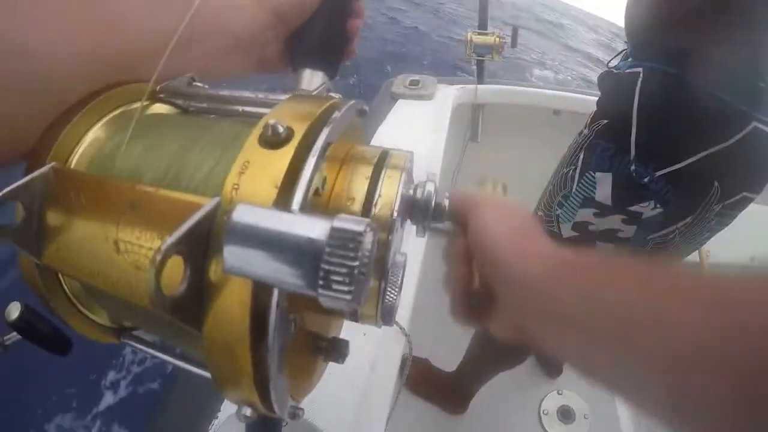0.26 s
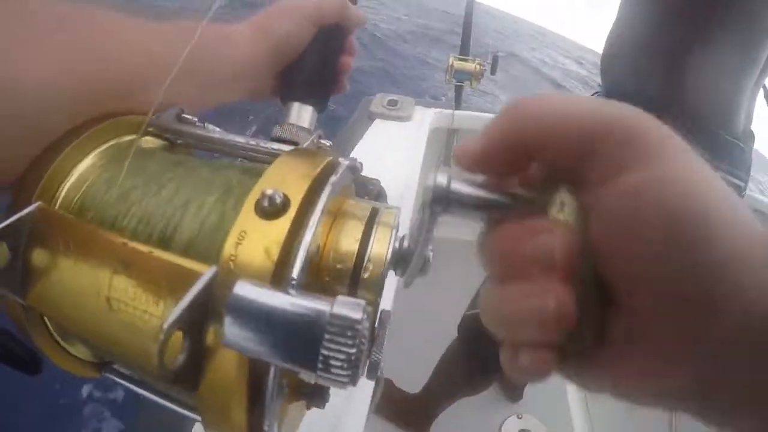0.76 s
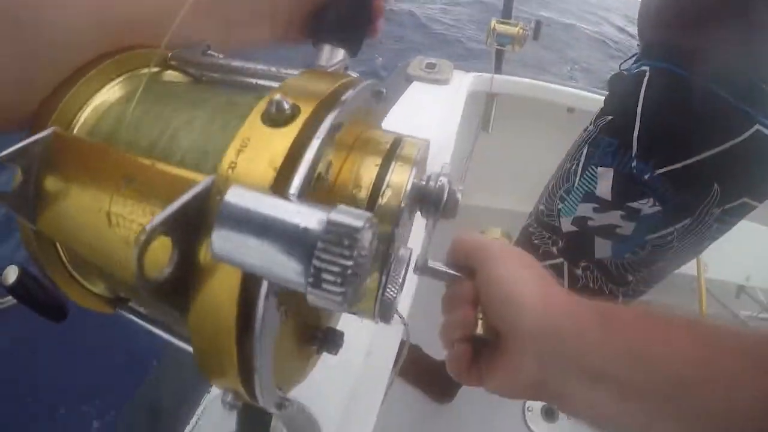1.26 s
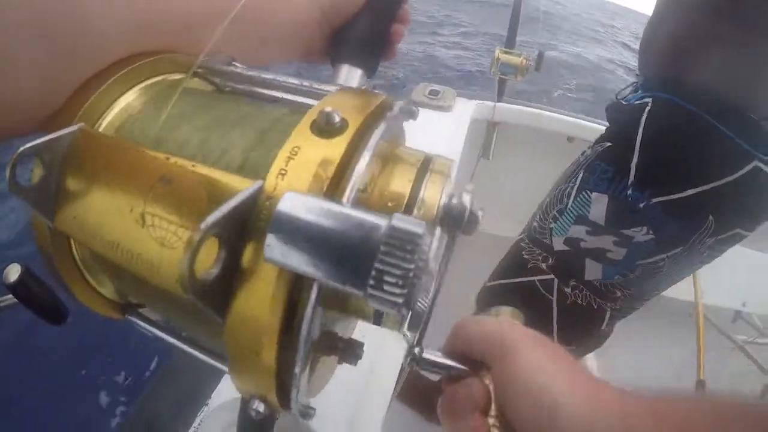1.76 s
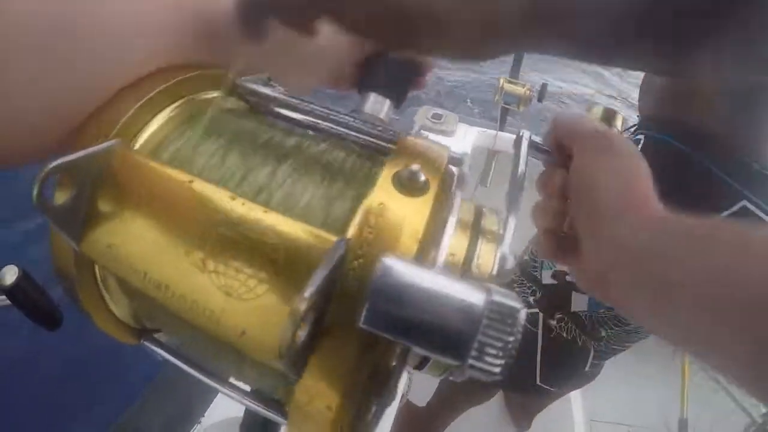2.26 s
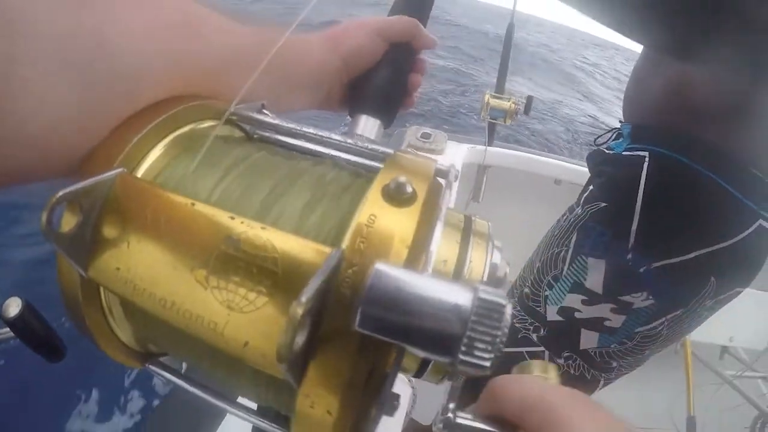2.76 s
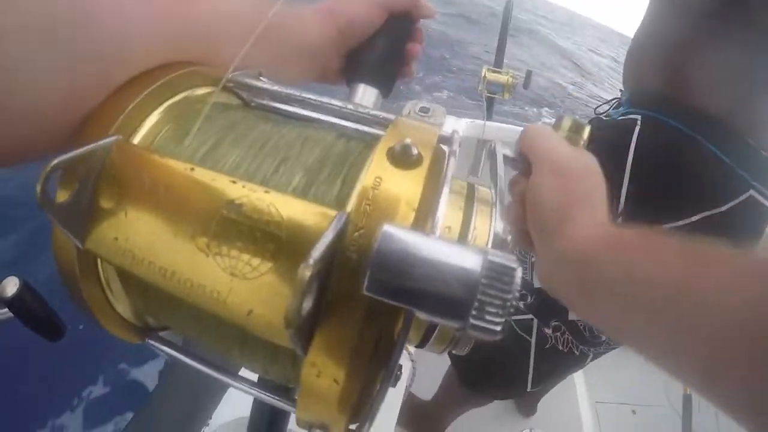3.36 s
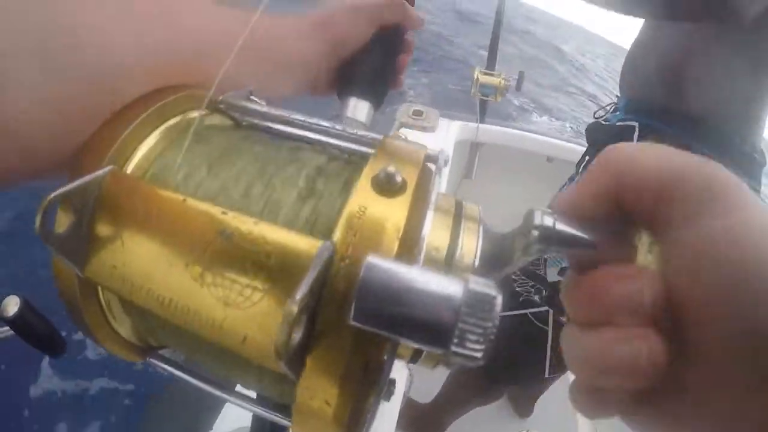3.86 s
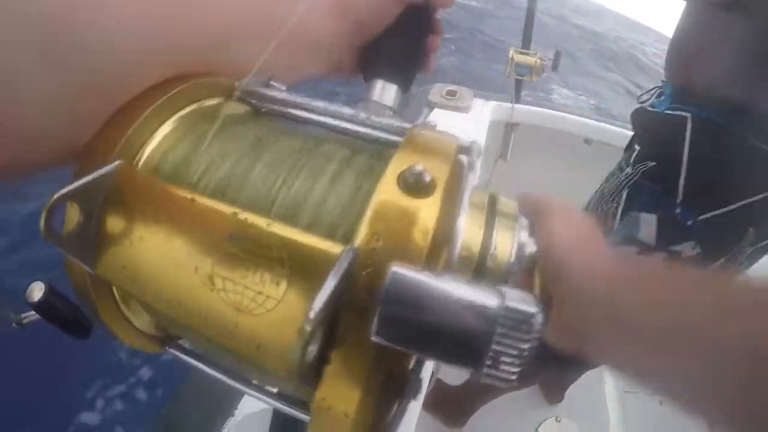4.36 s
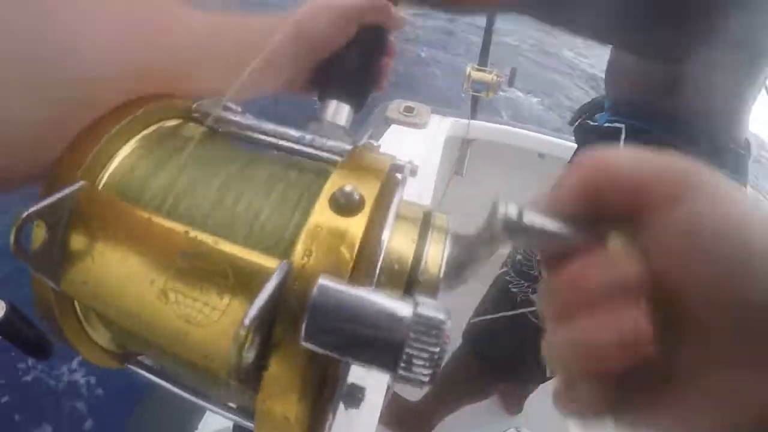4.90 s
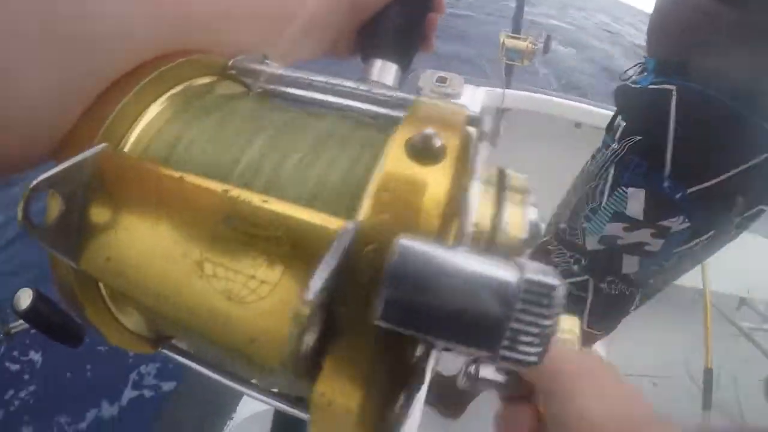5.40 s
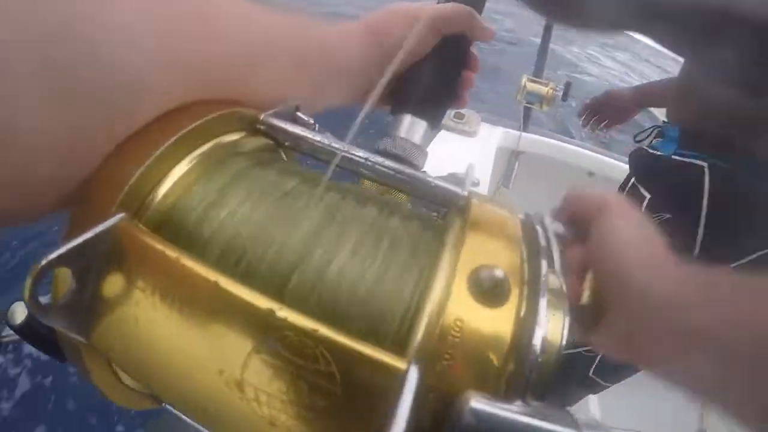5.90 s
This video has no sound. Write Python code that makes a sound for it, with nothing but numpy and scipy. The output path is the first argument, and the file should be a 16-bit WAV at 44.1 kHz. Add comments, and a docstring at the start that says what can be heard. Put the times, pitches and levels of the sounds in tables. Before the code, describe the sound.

Outdoors on a boat at sea, a ratcheting reel dominates, dry and close. Bright doubled metal clicks run together in bursts, loosen into single scraping ticks, almost pause, then race again with each turn of the handle. A thin, grainy gear whir follows the clicks. Behind it a low motor flutters, wind puffs dully against the microphone, water washes quietly with faint hollow plops, and a blunt bump shakes the mount near the end.

```python
"""Metallic clicks, single or in fast rattling runs: a big-game fishing reel cranked by hand on a boat.
Two sprung pawls, one just behind the other, snap over the spool's teeth: shaped noise rings a bank of frame modes.
Grainy friction noise rubs through narrow resonances. An unsteady sine throbs as the engine; lumpy low noise
is wind on the microphone, and softer coloured noise the sea. Short resonant puffs suggest water slopping,
and decaying low swings with blunt knocks are bumps on the mount."""
import sys
import numpy as np
from scipy import signal
from scipy.fft import rfft, irfft
from scipy.io import wavfile
from scipy.ndimage import uniform_filter1d

SR = 44100
rng = np.random.default_rng(int(sys.argv[2]) if len(sys.argv) > 2 else 0)


def put_to_file(sound):
    """Save the sound as 16-bit audio at rate SR, in the file named by the first command-line argument."""
    columns = np.atleast_2d(sound).T  # one column per channel
    safe = np.clip(columns, -1, 1)
    whole_steps = np.round(safe * 32767)
    wavfile.write(sys.argv[1], SR, whole_steps.astype(np.int16))


N = 270774


def amp(db):
    """Decibels to linear gain."""
    return 10 ** (np.asarray(db) / 20)


def evened(x):
    """Scale to rms 1."""
    return x / np.sqrt(np.mean(x ** 2) + 1e-20)


def curve(rows):
    """Value columns of a table whose first column is time, joined by straight lines over all samples."""
    s, *columns = np.transpose(rows)
    return [np.interp(np.arange(N) / SR, s, c) for c in columns]


def coloured(points):
    """Noise of rms 1 with the given spectrum, joined along log frequency."""
    hz = np.fft.rfftfreq(N, 1 / SR)
    f, db = np.transpose(points)
    gain = amp(np.interp(np.log(hz + 1), np.log(f + 1), db))
    return evened(irfft(rfft(rng.standard_normal(N)) * gain, N))


def wander(hz):
    """Random fluctuation of rms 1, slower than the given corner frequency."""
    lowpass = signal.butter(2, hz, fs=SR, output="sos")
    return evened(signal.sosfilt(lowpass, rng.standard_normal(N)))


def ring(x, hz, width):
    """A resonance of gain 1 at its centre; the narrower it is, the longer it rings."""
    r = np.exp(-np.pi * width / SR)
    return 2 * signal.lfilter([1 - r], [1, -r * np.exp(2j * np.pi * hz / SR)], x).real


def split(x):
    """Dull, bright and topmost parts."""
    bright_hz, top_hz = 4500, 9500
    bands = ((bright_hz, "low"), ((bright_hz, top_hz), "band"), (top_hz, "high"))
    return [signal.sosfilt(signal.butter(3, hz, kind, fs=SR, output="sos"), x) for hz, kind in bands]


def engine():
    """A throbbing sine whose firing rate and level both wander, as uneven combustion does."""
    # slow course of the engine's rms before its flutter: (time [s], level [dB])
    engine_level = [(0, -35.5), (1.25, -38), (1.4, -36), (1.9, -39), (2.7, -34.5), (3.75, -39),
                    (5.27, -38.5), (6.14, -36)]
    firing_hz = 29.3 + 3.6 * wander(hz=9)
    turns = np.cumsum(firing_hz) / SR
    level_db = curve(engine_level)[0] + 2.8 * wander(hz=6.3)
    return np.sqrt(2) * amp(level_db) * np.sin(2 * np.pi * turns)


def wind():
    """Turbulence on the microphone: low noise whose gusts rise and fall exponentially, broken into lumps."""
    # gust peaks, added to the lull before the lumps: (time [s], level [dB])
    gust_peaks = [(0, -37), (.7, -34), (1.08, -32), (1.4, -39), (1.69, -37.5), (2.51, -42.5), (2.77, -38),
                  (3.69, -39), (4.05, -47), (4.35, -40.5), (4.7, -43), (5.27, -28.5), (5.4, -31),
                  (6.12, -40)]
    # colour of the buffeting: (frequency [Hz], density [dB per Hz])
    wind_colour = [(6, -22), (12, 6), (22, -0.5), (33, -14), (42, -9), (62, -5), (81, -7), (126, -14.5),
                   (200, -27), (300, -33), (520, -37.5), (880, -120)]
    lull_db, rise_s, fall_s = -42.5, 0.031, 0.044
    t = np.arange(N) / SR
    strength = amp(lull_db)
    for s, db in gust_peaks:
        strength = strength + amp(db) * np.exp(np.minimum((t - s) / rise_s, (s - t) / fall_s))
    lumps = amp(2.57 * wander(hz=21))
    return strength * lumps * coloured(wind_colour)


def sea():
    """Sea and wake: a swelling wash of coloured noise, made slightly lumpy at two speeds."""
    # colour of the wash: (frequency [Hz], density [dB per Hz])
    sea_colour = [(88, -36), (150, 1.5), (264, -4), (1360, -4), (2100, -2.5), (2870, -10), (3290, -11.5),
                  (5150, -23), (13400, -31), (16000, -37)]
    # its swell, before the lumps: (time [s], level [dB])
    swell = [(0, -51.5), (.6, -49.5), (1.6, -53.5), (2.0, -51.5), (3.2, -50.5), (4.6, -54), (5.0, -49.5),
             (6.14, -50)]
    level_db = curve(swell)[0] + 0.97 * wander(hz=8.9) + 0.91 * wander(hz=40)
    return amp(level_db) * coloured(sea_colour)


def teeth():
    """Times, levels, brightness and scraping of all snaps: each tooth trips the first pawl, then the second."""
    # teeth passed slowly, one by one: (time [s], level [dB], brightness [dB])
    slow_snaps = [(.0083, -33, -12), (0.0567, -27.5, -12), (.098, -30.5, -8), (.1301, -27.5, -8),
                  (.1595, -25.5, -5), (.1827, -27, -8), (0.1994, -24.5, -9), (.393, -29.5, -7),
                  (.409, -39, -7), (.418, -32, -10), (0.4558, -31, -10.5), (.504, -32.5, -13),
                  (.5505, -30, -15), (0.586, -30, -13.5), (.619, -30.5, -13), (0.6544, -30.5, -14),
                  (.6918, -32.5, -9), (0.7303, -28, -12.5), (0.7768, -31.5, -11), (0.841, -33, -12),
                  (.893, -31, -8.5), (1.192, -31, -5.5), (1.3052, -34, -1), (1.366, -34, -3),
                  (1.6413, -43, -1), (1.6688, -34, -7), (1.689, -36.5, -6), (1.7222, -31, -5.5),
                  (1.7556, -35, -4), (2.226, -35, -15), (2.2392, -36, -0.5), (2.2842, -31.5, -7),
                  (2.3495, -31, -12), (2.4014, -32.5, -8), (2.453, -30.5, -9), (2.501, -30, -10),
                  (2.5637, -30.5, -10), (2.645, -32, -5.5), (2.6603, -31, -6), (2.9876, -28.5, -7),
                  (3.0108, -28.5, -6), (3.0419, -31.5, -3.5), (3.074, -33.5, -10), (3.0995, -31.5, -9),
                  (3.144, -41.5, 1.5), (3.164, -34, -6.5), (3.2278, -29.5, -11), (3.2928, -31, -9.5),
                  (3.3699, -30, -6), (3.4258, -28.5, -8.5), (3.4717, -28, -10), (3.8595, -42, -2.5),
                  (3.8768, -33.5, -14), (4.062, -35.5, -8), (4.1796, -33.5, -6.5), (4.2058, -32.5, -3),
                  (4.6152, -36, -10), (4.663, -34.5, -6), (4.7044, -29.5, -10), (5.026, -32, -9),
                  (5.077, -32, 0.5), (5.4764, -31, -11), (6.109, -31.5, -7)]
    # clean lone ticks of one pawl: (time [s], level [dB], brightness [dB])
    lone_ticks = [(.88, -35, -17), (1.23, -27, -11), (1.464, -28.5, -17), (1.5566, -33.5, -24),
                  (4.1123, -30, -23), (4.136, -35, -19), (4.5145, -28.5, 1.5), (4.5755, -44, -16),
                  (4.637, -25.5, -17)]
    # fast runs, one curve each, before the tooth-to-tooth scatter:
    # (time [s], teeth passed [count], lag of second pawl [ms], level [dB], second pawl above first [dB])
    fast_runs = [
        [(.2063, 0, 9.5, -26, 5), (.2253, 1, 7, -23, 4), (.2415, 2, 6, -25, 3), (.283, 5, 7, -23, 1),
         (.2965, 6, 6, -34, 12), (.3117, 7, 7, -21.5, 2), (.3597, 10, 7.5, -24, 0)],
        [(.929, 0, 8, -32, 1), (.9488, 1, 7.5, -31, 1), (.9818, 3, 8, -22.5, 1), (.997, 4, 10.5, -21, 2),
         (1.0147, 5, 12, -23, 2), (1.0363, 6, 8, -17, -6), (1.0556, 7, 12, -19, 1), (1.076, 8, 7, -30, 11),
         (1.0943, 9, 7, -20, -4), (1.1123, 10, 9, -20, -2), (1.147, 12, 9, -22, 0), (1.163, 13, 11, -30, 0)],
        [(1.7816, 0, 7, -35, 0), (1.811, 1, 10, -32, -2), (1.857, 3, 7, -30, 0), (1.914, 6, 7.5, -29, 1),
         (1.952, 8, 9, -25, 2), (1.99, 10, 8, -26, 2), (2.0425, 13, 9, -20.5, 3), (2.06, 14, 7, -24, -1),
         (2.0777, 15, 8.5, -22, -2), (2.1, 16, 8, -27, -5), (2.1529, 18, 7.5, -28, -7),
         (2.2074, 20, 9, -33, -12)],
        [(2.688, 0, 9.5, -23, 0), (2.7425, 3, 10.5, -23, 2), (2.7643, 4, 7, -22, 0), (2.7955, 6, 6.5, -22, 0),
         (2.869, 11, 6.5, -22, 2), (2.943, 16, 7, -24, 2), (2.96, 17, 13, -24, -3)],
        [(3.4987, 0, 10, -34, 5), (3.5264, 1, 9, -32, 3), (3.547, 2, 8, -31, 0), (3.578, 4, 8, -29, 0),
         (3.608, 6, 9, -22, 0), (3.6536, 9, 8, -22, 0), (3.7135, 13, 7, -22, -4), (3.728, 14, 9, -20, -3),
         (3.745, 15, 6, -19, -10), (3.777, 17, 9, -21, -1), (3.817, 19, 10, -21, -4), (3.841, 20, 9, -29, -10)],
        [(4.233, 0, 7, -30, -2), (4.281, 3, 12, -28, 6), (4.305, 4, 12, -19.5, 2), (4.3755, 7, 11.5, -14, 0),
         (4.399, 8, 12, -18.5, -2), (4.422, 9, 7, -25, 3), (4.446, 10, 9, -24, 4)],
        [(4.7404, 0, 8, -30, -4), (4.781, 2, 8, -28, -3), (4.808, 3, 9, -28, 1), (4.831, 4, 7.5, -26, 0),
         (4.846, 5, 8, -22.5, -1), (4.889, 8, 7, -21, -2), (4.902, 9, 11.5, -19, 0), (4.919, 10, 9.5, -20, 0),
         (4.9356, 11, 10.5, -21, 0), (4.978, 13, 11, -31, -10)],
        [(5.104, 0, 8.5, -24, -2), (5.129, 1, 9, -26, 2), (5.15, 2, 8.5, -25, 4), (5.19, 4, 8.5, -28, 0),
         (5.2165, 5, 12, -25, -12), (5.238, 6, 16, -22, -3), (5.262, 7, 8, -25, 0), (5.282, 8, 13, -23, 0),
         (5.328, 10, 12.5, -22, -3), (5.351, 11, 12.5, -16, -3), (5.3736, 12, 11.5, -17, -3),
         (5.391, 13, 9, -19, -7), (5.408, 14, 9, -23, -2), (5.433, 15, 9, -27, -8), (5.484, 17, 8, -28, -6),
         (5.507, 18, 7.5, -24, -7), (5.6026, 22, 7, -30, 0), (5.62, 23, 8.5, -31, -6)],
        [(5.6815, 0, 10, -33, -6), (5.7233, 2, 9, -29, -10), (5.742, 3, 7, -30, 0), (5.763, 4, 10, -28, -8),
         (5.797, 6, 11, -29, -4), (5.868, 10, 13, -25, -2), (5.904, 12, 11.5, -27, 4), (5.942, 14, 14, -23, -2),
         (5.9876, 16, 13, -26, 1), (6.072, 20, 14, -28, -2)],
    ]
    # touch of each run, for a snap of -25 dB:
    # (brightness of first pawl [dB], brightness of second pawl [dB], share of scraping [0-1])
    run_touch = [(-3.5, -0.5, 0.09), (-4, -5, 0.24), (-5, -5.5, 0.17), (-5.5, -2.5, 0.16), (-3.5, -3, 0.24),
                 (-5.5, -5, 0.26), (-4.5, -8, 0.24), (-3, -8, 0.44), (-6, -2.5, 0.42)]
    slow_lag_ms, slow_second_db, slow_scrape = 8.2, -12, 0.33
    jitter_ms, uneven_db, uneven_bright_db = .4, 1.3, 2.5  # scatter from tooth to tooth
    scrape_per_db, bright_per_db = 0.01, 0.2954  # in runs, strong snaps scrape less and are brighter

    s, db, bright_db = np.transpose(slow_snaps)
    scrape = np.full(len(s), slow_scrape)
    rows = [(s, db, bright_db, scrape),
            (s + slow_lag_ms / 1000, db + slow_second_db, bright_db, scrape),
            (*np.transpose(lone_ticks), np.zeros(len(lone_ticks)))]
    for run, (first_bright_db, second_bright_db, scrape) in zip(fast_runs, run_touch):
        at, passed, *columns = np.transpose(run)
        # one moment for each whole tooth
        s = np.interp(np.arange(round(passed[-1]) + 1), passed, at)
        lag_ms, db, second_db = (np.interp(s, at, c) for c in columns)
        above_25 = db + 25
        pawl_pair = ((0, db, first_bright_db), (lag_ms, db + second_db, second_bright_db))
        for delay_ms, level_db, bright_db in pawl_pair:
            a, b, c = rng.standard_normal((32, 3))[:len(s)].T
            rows.append((s + (delay_ms + jitter_ms * a) / 1000,
                         level_db + uneven_db * b,
                         bright_db + bright_per_db * above_25 + uneven_bright_db * c,
                         scrape - scrape_per_db * above_25))
    rows = np.hstack(rows)
    return rows[:, np.argsort(rows[0])]


def struck(at, db, scrape, rise, fall, slow_fall):
    """Envelope of all snaps: a clean snap swells and stops, a scraping one drags on before it stops."""
    out, t = np.zeros(N), np.arange(3000) / SR
    for share, time in ((1 - scrape, fall), (scrape, slow_fall)):
        blows = np.zeros(N)
        blows[at] = amp(db) * np.sqrt(share)
        shape = (1 - np.exp(-t / rise)) ** 2 * np.exp(-(t / time) ** 1.52)
        shape *= np.sqrt(0.00099 * SR) / np.linalg.norm(shape)  # same energy however long it lasts
        out += signal.oaconvolve(blows, shape)[:N]
    return out


def latest_snap(at):
    """For every sample, the index of the snap last begun."""
    return np.clip(np.searchsorted(at, np.arange(N)) - 1, 0, None)


def held(x, drive, at):
    """Each snap spends the energy its spring stored: its energy is pulled towards that of its drive."""
    ratio = np.add.reduceat(drive ** 2, at) / (np.add.reduceat(x ** 2, at) + 1e-12)
    gain = np.clip(ratio, .2, 5) ** .4
    return x * uniform_filter1d(gain[latest_snap(at)], size=30)


def pawl():
    """Each snap is a burst of chatter, which rings the metal frame with another balance of modes each time."""
    # the reel's frame and side plates, before the balance varies: (frequency [Hz], width [Hz], level [dB])
    frame_modes = [(728, 18, -8.5), (1280, 17, -6.5), (1592, 51, -1), (2166, 143, -1), (2678, 27, 2),
                   (2803, 186, -0.5), (3282, 168, 5.5), (3654, 99, 1), (3840, 62, -9), (4584, 58, -2.5),
                   (5540, 145, -9.5), (7000, 176, -6), (8150, 140, -18.5), (9960, 240, -12.5)]
    # rattle of the small parts between the modes: (frequency [Hz], density [dB per Hz])
    rattle_colour = [(240, -80), (400, -27), (1130, -20), (1580, -7.5), (2400, -11), (3260, -5.5),
                     (5110, -11.5), (7170, 4), (9500, -41.5), (12500, -16), (15000, -22), (16500, -40)]
    # ring of the pawl spring: (time [s], level [dB])
    spring_level = [(0, 10), (.18, -12), (.4, -6), (.5, 12), (.85, 10), (1.05, -13), (2.05, -4), (2.5, -4),
                    (3.2, -4), (3.7, -11), (4.4, -4), (4.7, -1.5), (6.14, -10)]
    spring_hz, spring_width_hz = 10900, 600
    hiss_db = -5
    treble_scrape = .7  # share of the scraping that reaches the treble

    s, db, bright_db, scrape = teeth()
    at = np.clip((s * SR).astype(int), 0, N - 1)
    which = latest_snap(at)
    # the balance drifts over a few neighbouring snaps
    drift = uniform_filter1d(rng.standard_normal((len(s), len(frame_modes))), 4, axis=0)
    balance = amp(2.5 * evened(drift))
    grit = amp(1.26 * wander(hz=1430))  # the chatter is a cluster of tiny knocks

    scrape, thin = np.clip([scrape, treble_scrape * scrape], 0, 1)
    # rise, clean fall and scraping fall [s] of the dull, bright and topmost chatter
    drives = (struck(at, db, scrape, .0012, 0.0033, 0.016),
              struck(at, db + bright_db, thin, .0011, 0.0017, 0.013),
              struck(at, db + 1.16 * bright_db, thin, .0011, 0.0029, 0.014))
    rattles = split(coloured(rattle_colour))

    # topmost part: hiss of the rattle and ring of the spring
    out = amp(hiss_db) * rattles[2] * drives[2] * grit
    spring = ring(rng.standard_normal(N) * drives[2], spring_hz, spring_width_hz)
    out += amp(curve(spring_level)[0]) * spring

    # dull and bright parts: rattle mixed with the ringing frame [dB above the rattle]
    for half, ring_db in enumerate([4, -1]):
        chatter = rng.standard_normal(N) * drives[half] * grit
        modes = np.zeros(N)
        for k, (hz, width, mode_db) in enumerate(frame_modes):
            modes += amp(mode_db) * ring(chatter * balance[which, k], hz, width)
        rattle = evened(rattles[half] * drives[half] * grit)
        parts = rattle + amp(ring_db) * evened(split(modes)[half])
        level = np.sqrt(np.mean(drives[half] ** 2))
        out += held(level * evened(parts), drives[half], at)
    return out


def rub(pawls):
    """Gears rub: grainy friction in narrow resonances of the spool, its power following the work of the pawls."""
    # what the rubbing sings in: (frequency [Hz], width of the sharper filter [Hz], level [dB])
    rub_modes = [(1776, 120, -12.5), (2040, 28, -6), (3264, 86, -2), (3317, 400, -5.5), (3650, 240, -9.5),
                 (4250, 660, -23), (7280, 120, -29)]
    # line drag between runs: (middle [s], length [s], level [dB])
    whirs = [(1.598, .3, -56.5), (2.505, 0.42, -43.5), (3.182, 0.37, -49.5), (3.905, 0.63, -46.5),
             (4.556, 0.68, -53)]
    under_pawl_db, smear_s, idle_db = -15.5, 0.053, -63
    grain = rng.standard_normal(N) * amp(2.0 * wander(hz=120))
    rung = np.zeros(N)
    for hz, width, db in rub_modes:
        rung += amp(db) * ring(ring(grain, hz, width), hz, 3 * width)
    t = np.arange(N) / SR
    pawl_power = abs(uniform_filter1d(pawls ** 2, int(smear_s * SR)))
    power = amp(2 * under_pawl_db) * pawl_power + amp(2 * idle_db)  # doubled dB: these are powers
    for s, length, db in whirs:
        power += amp(2 * db) * np.exp(-(4 * (t - s) / length) ** 2)
    return np.sqrt(power) * evened(rung)


def bloops():
    """Perhaps water slopping: soft puffs of noise in a narrow resonance and its overtone."""
    # short faint tones, level before the puff's fade: (time [s], length [s], frequency [Hz], level [dB])
    puffs = [(0.524, 0.025, 980, -45), (0.591, 0.048, 430, -47), (0.604, 0.057, 1005, -51),
             (2.308, .05, 983, -43.5), (2.412, 0.046, 387, -50), (2.534, 0.054, 710, -51),
             (3.231, 0.091, 1050, -48)]
    out = np.zeros(N)
    for s, length, hz, db in puffs:
        noise = rng.standard_normal(8000)
        tone = ring(noise, hz, 47.0) + 0.7 * ring(noise, 2 * hz, 60.)
        puff = evened(tone[-round(length * SR):])  # the end, where the resonance has built up
        out[round(s * SR):][:len(puff)] += amp(db) * np.hanning(len(puff)) * puff
    return out


def bumps():
    """A low, lopsided, decaying swing of the microphone and a blunt knock that rings the mount."""
    # bumps on the mount, swing level before its rise and decay:
    # (swing time [s], swing level [dB], swing frequency [Hz], t60 [s], knock time [s], knock level [dB])
    bump_rows = [(0.739, -13.5, 91, 0.028, .731, -16.5), (5.2519, -2.5, 101, 0.061, 5.249, -25),
                 (5.393, -17.5, 105, 0.06, 5.393, -30)]
    # modes of the mount: (frequency [Hz], width [Hz], level [dB])
    mount_modes = [(292, 69, -7), (520, 39, -15.5), (850, 140, -16.5), (1230, 150, -30)]
    out, knocks, t = np.zeros(N), np.zeros(N), np.arange(6000) / SR
    for s, db, hz, t60, knock_s, knock_db in bump_rows:
        lopsided = 0.24 * np.sin(4 * np.pi * hz * t) * amp(-40 * t / t60)  # the octave dies sooner
        swing = np.sin(2 * np.pi * hz * t) - lopsided
        envelope = (1 - np.exp(-t / 0.0034)) ** 2 * amp(db - 60 * t / t60)
        out[round(s * SR):][:len(t)] -= swing * envelope
        knocks[round(knock_s * SR):][:15] = -amp(knock_db) * np.hanning(15) / 7
    for hz, width, db in mount_modes:
        out += amp(db) * ring(knocks, hz, width) * SR / (2 * np.pi * width)
    return out


def scene():
    """All layers summed into one channel; the rubbing follows the pawls."""
    pawls = pawl()
    return (engine() + wind() + sea() + pawls + rub(pawls) + bloops() + bumps())[None]


def record(dry):
    """The band limit: a steep lowpass at 15.9 kHz."""
    lowpass = signal.firwin(511, 15900, window=("kaiser", 9), fs=SR)
    return signal.oaconvolve(dry, lowpass[None], "same")


dry = scene()
out = record(dry)
put_to_file(out)
```